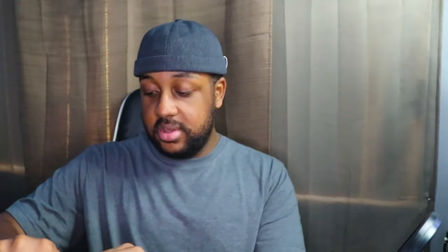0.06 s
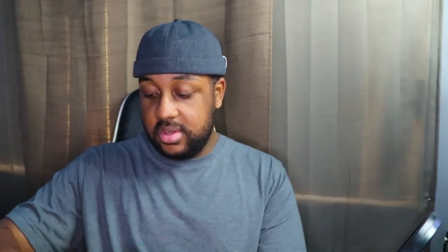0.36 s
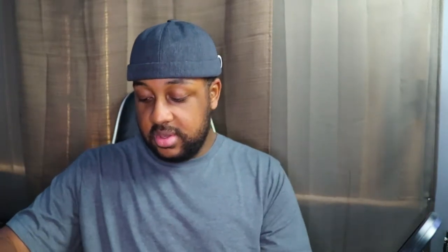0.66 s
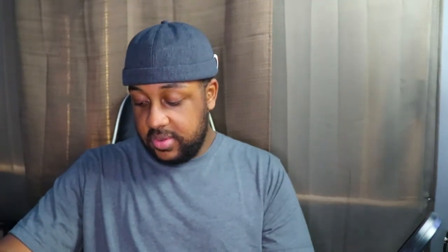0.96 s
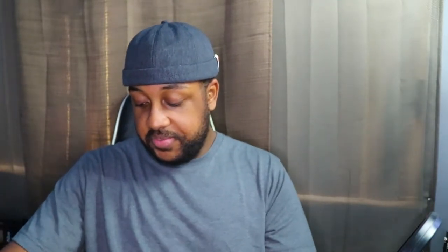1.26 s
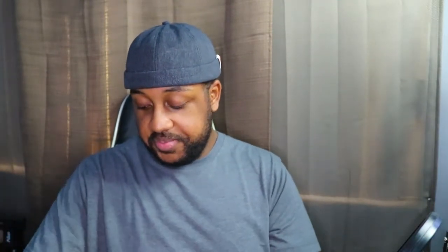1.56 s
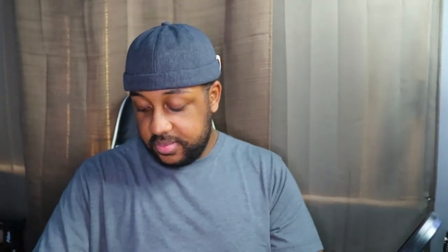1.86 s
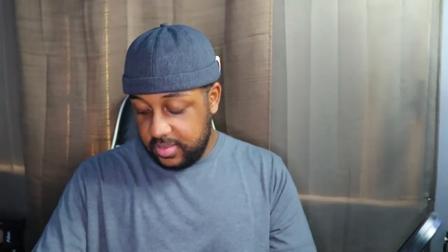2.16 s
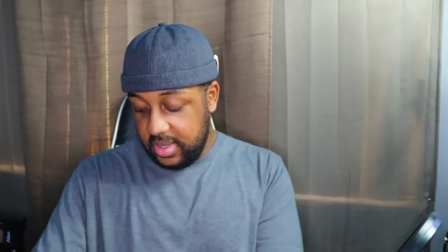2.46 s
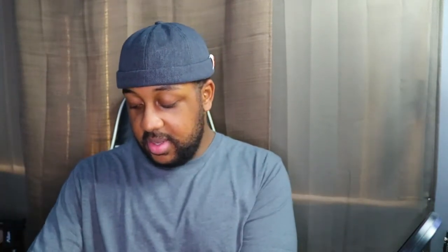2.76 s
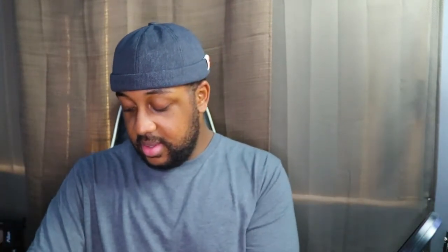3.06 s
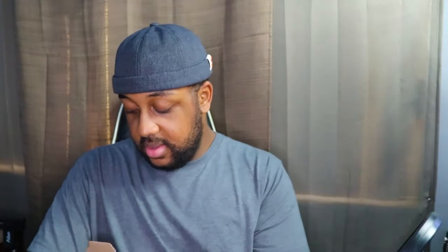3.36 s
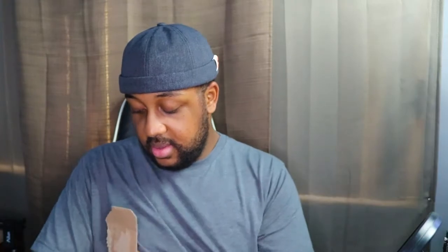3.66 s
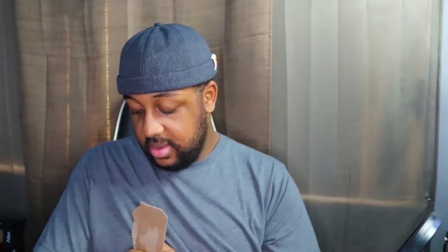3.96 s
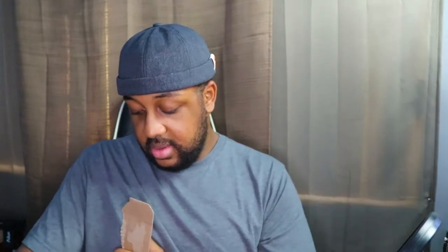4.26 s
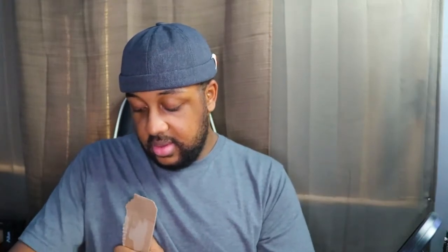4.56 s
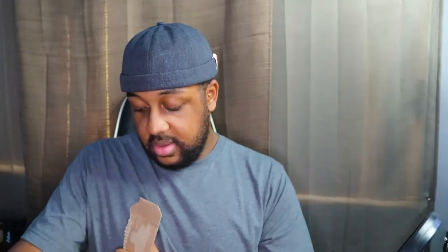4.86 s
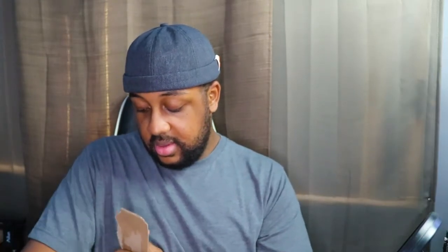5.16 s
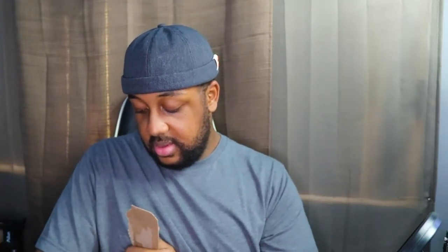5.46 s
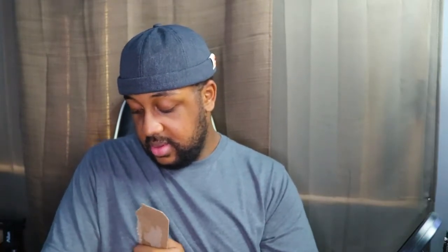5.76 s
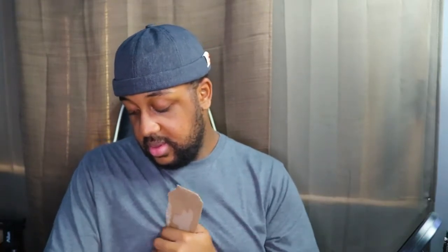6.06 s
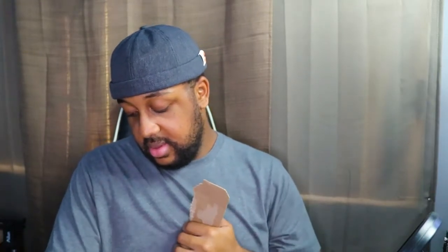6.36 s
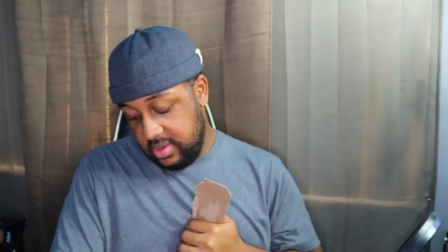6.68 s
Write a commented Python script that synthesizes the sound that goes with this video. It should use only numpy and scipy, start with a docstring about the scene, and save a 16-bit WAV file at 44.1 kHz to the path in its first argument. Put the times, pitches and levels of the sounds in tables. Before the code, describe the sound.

Hands tear open a small cardboard package close to the microphone in a small room. A quick run of short rips and snapping creases comes first, then a stiff flap pops loose. More tearing follows, then a quieter stretch of fingers rubbing the card and crinkling thin wrapping, before another cluster of rips and snaps. A faint room rumble lies underneath.

```python
"""Tearing open a cardboard package

Hands tear open a small box close to a microphone pair in a small room. Each tug is a short rip:
breaking fibres ring the card. Creases snap and a stiff flap pops loose. Between tugs the fingers
rub the card and crinkle the wrapping over a faint room rumble."""
import sys
import numpy as np
from scipy import signal
from scipy.fft import rfft, irfft, next_fast_len
from scipy.io import wavfile
from scipy.ndimage import map_coordinates

SR = 44100
rng = np.random.default_rng(int(sys.argv[2]) if len(sys.argv) > 2 else 0)


def digitize_waveform(pressure):
    """Quantize a signal to 16-bit integers and store it at the path in sys.argv[1].

    Rows of a 2-D input are taken as channels; values are limited to [-1, 1].
    """
    field = np.atleast_2d(pressure).T
    bounded = np.clip(field, -1, 1)
    quanta = np.round(bounded * 32767).astype(np.int16)
    wavfile.write(sys.argv[1], SR, quanta)


N = 305266
SIZE = 16384  # samples per event
HZ = np.fft.rfftfreq(SIZE, 1 / SR)
T = np.arange(SIZE) / SR

# Event levels are relative within each layer.
# room rumble spectrum: f/Hz, level/dB
RUMBLE_SPECTRUM = [(20, -10), (50, -10.5), (100, -8.5), (205, -0.5), (300, -8), (700, -11), (1200, -23),
                   (2400, -17), (7500, -27), (16000, -42)]
# sliding finger spectrum: f/Hz, level/dB
RUB_SPECTRUM = [(100, -10), (250, -7.5), (500, -2), (1200, -0.5), (2200, -7), (4000, -11), (16000, -36)]
# thin wrapping spectrum: f/Hz, level/dB
WRAPPING_SPECTRUM = [(600, -7.5), (2000, -10.5), (3500, 3.5), (6000, 1.5), (8500, -0.5), (11000, -5),
                     (16000, -11)]
# finger slides to a new hold: t/s, length/s, rub/dB, crinkle/dB
SLIDES = [(0.226, 0.022, -50, -53), (1.37, 0.1, -45, -44.5), (1.66, 0.03, -55, -65),
          (1.814, 0.015, -45, -50.5), (2.108, 0.094, -60, -58), (2.66, 0.037, -67, -53.5),
          (2.732, 0.14, -56, -54), (2.933, 0.016, -41.5, -53), (3.093, 0.041, -58, -44.5),
          (3.225, 0.14, -50, -48), (3.75, 0.12, -58, -57.5), (4.138, 0.13, -54.5, -54.5),
          (4.245, 0.04, -44.5, -61), (4.352, 0.069, -52.5, -65), (4.592, 0.15, -49.5, -70),
          (4.72, 0.15, -54, -54), (4.915, 0.087, -50, -52), (5.11, 0.19, -53.5, -59.5),
          (5.566, 0.13, -55.5, -50.5), (6.293, 0.052, -53, -53), (6.605, 0.054, -65, -57.5)]
# hands still: t/s, length/s
RESTS = [(1.934, 0.18), (2.362, 0.065), (4.027, 0.091), (4.31, 0.055), (4.534, 0.064), (5.747, 0.11),
         (6.395, 0.23)]
# tugs: t/s, length/s, level/dB, hollow/dB, card ring/dB
TUGS = [(0.018, 0.013, -24.5, -3, -0.5), (0.043, 0.013, -20.5, -8.5, -1.5), (0.074, 0.014, -24, 9.5, 8),
        (0.301, 0.015, -20.5, -0.5, 3), (0.337, 0.013, -20, 4.5, -4), (0.3723, 0.013, -17.5, 1, -1),
        (0.533, 0.051, -40.5, -2, -2), (0.581, 0.017, -24.5, -2.5, -2.5), (0.613, 0.024, -21, -4, -1.5),
        (0.753, 0.023, -22.5, -7, -2.5), (0.968, 0.016, -19, -4.5, 1), (1.128, 0.01, -16, -4.5, 0.5),
        (1.247, 0.0074, -14, -5, 1.5), (1.279, 0.061, -32, -4, 2), (1.306, 0.011, -15.5, -10.5, -2),
        (1.483, 0.028, -21.5, -8.5, 0.5), (3.155, 0.024, -23.5, -6, 0), (3.324, 0.021, -22.5, -8, 2.5),
        (3.585, 0.067, -19, -8, 1.5), (5.373, 0.02, -29.5, -7.5, -3.5), (5.42, 0.04, -28.5, -6, 0.5),
        (5.665, 0.026, -31, 0, 4), (5.889, 0.033, -26, -5, 1), (5.924, 0.046, -26.5, -2.5, 0.5),
        (5.995, 0.016, -29, -2, -1), (6.111, 0.027, -24, -12, 4), (6.158, 0.024, -26.5, -4, -0.5),
        (6.901, 0.016, -21, -7.5, -5.5)]
# torn card spectrum: f/Hz, level/dB
CARD_SPECTRUM = [(20, -32), (50, -25.5), (200, -11.5), (300, -10), (550, -4.5), (780, -5), (1270, -4),
                 (1700, -4), (2200, -9), (3000, -7), (7200, -12), (8400, -15), (10000, -17), (15500, -24.5)]
# box panel resonances: f/Hz, width/Hz, level/dB
PANEL_MODES = [(640, 77, -14.5), (965, 50, -37), (1287, 150, -2), (5150, 950, -11), (8500, 350, 0.5)]
# creases and glue spots: t/s, level/dB, body/dB, sizzle/dB
SNAPS = [(0.078, -17, 2, -29), (0.3056, -15, -2, -12), (0.5761, -14, -24, 2.5), (0.934, -36.5, -14, 18),
         (1.354, -18, -15, 10.5), (2.3233, -40, -8, -2), (2.4374, -27, -5, 12), (3.074, -25, -46, 9),
         (3.1463, -28, 2, 2), (3.1681, -13, -9, 0), (3.3063, -12.5, -3, 4.5), (3.321, -15, -17, -11),
         (3.61, -11.5, -5, -8), (3.7807, -25.5, 3, -8), (4.721, -24.5, -1.5, 6.5), (5.4349, -18, -2.5, -9),
         (5.6738, -20, -8.5, -32), (5.8836, -12, -13, -6.5), (5.9362, -18.5, 3, -10),
         (6.1122, -11, -12.5, -4), (6.12, -15.5, -12, 10), (6.649, -41, -16, 7), (6.811, -36.5, -4, -7),
         (6.9077, -23.5, 0, 16)]
# flap springs free or knocks: t/s, level/dB, brightness/dB
FLAP_POPS = [(1.819, -33.5, -4), (2.457, -7.5, -0.5), (2.4575, -15, 15), (2.4642, -28.5, -2),
             (2.4673, -20, -2), (2.938, -33, 7.5), (2.953, -30, -19), (4.6827, -23, -9)]
# flap spectrum: f/Hz, level/dB
FLAP_SPECTRUM = [(40, -37), (180, -16), (330, -6), (510, 4.5), (760, 1), (1200, -4.5), (1550, 5),
                 (2100, -6.5), (2800, -1.5), (4200, -5), (8000, -9), (10500, -12.5), (13000, -23),
                 (16000, -29)]
# top treble boost as the package is lifted: t/s, gain/dB
LIFT_GAIN = [(4.7, 4.5), (5.4, 9.5), (6.9, 4.5)]
# room decay: f/Hz, T60/s
ROOM_T60 = [(150, 0.35), (500, 0.21), (1300, 0.25), (4000, 0.23), (9000, 0.2), (16000, 0.16)]
# microphone balance: f/Hz, left minus right/dB
MIC_BALANCE = [(100, 2.2), (600, 0.6), (1400, 0), (2800, -1.3), (5500, -1), (10000, 1.5), (14000, 1.5)]


def amp(db):
    """Decibels to gain."""
    return 10 ** (np.asarray(db) / 20)


def unit(x):
    """Scale to rms 1."""
    return x / np.sqrt(np.mean(np.abs(x) ** 2) + 1e-20)


def along(points, hz):
    """Interpolate (f/Hz, value) points on a log axis."""
    f, v = np.transpose(points)
    return np.interp(np.log(hz + 1), np.log(f + 1), v)


def wobble(rate_hz, size):
    """Smooth random curve, rate_hz knots a second."""
    knots = rng.standard_normal(int(size * rate_hz / SR) + 4)
    return map_coordinates(knots, [np.arange(size) * rate_hz / SR], order=2)


def filtered(x, response):
    """Apply a frequency response."""
    m = next_fast_len(N + SIZE)
    return irfft(rfft(x, m) * response(np.fft.rfftfreq(m, 1 / SR)), m)[..., :N]


def shaped(x, spectrum):
    """Filter by a spectrum table, rms 1."""
    return unit(filtered(x, lambda hz: amp(along(spectrum, hz))))


def causal(gain):
    """Minimum-phase response: rings only after its cause."""
    cepstrum = irfft(np.log(np.maximum(gain, 1e-6)))
    cepstrum[1:SIZE // 2] *= 2
    cepstrum[SIZE // 2 + 1:] = 0
    return np.exp(rfft(cepstrum))


def add(track, at_s, sound):
    """Mix a sound in."""
    part = track[:, max(round(at_s * SR), 0):][:, :SIZE]
    part += sound[:, :part.shape[1]]


def diffuse(size, alike_hz=900):
    """Noise from all sides: the microphones agree only on long waves."""
    a, b = rfft(rng.standard_normal((2, size)))
    coherence = 0.98 * np.exp(-(np.fft.rfftfreq(size, 1 / SR) / alike_hz) ** 2)
    turn = np.arccos(coherence) / 2
    mid, side = np.cos(turn) * a, np.sin(turn) * b
    return irfft([mid + side, mid - side], size)


def walls(near_db=7, near_decay_s=0.0068, build_s=0.003):
    """Stereo echo response: hands and desk scatter at once, then the room decays."""
    hz, t, bands = signal.stft(diffuse(SIZE * 3 // 4), SR, nperseg=256)
    decay = amp(-60 * t / along(ROOM_T60, hz)[:, None])
    tail = signal.istft(bands * decay, SR, nperseg=256)[1]
    t = T[:tail.shape[1]]
    onset = 1 - np.exp(-t / build_s)
    scatter = 1 + amp(near_db) * np.exp(-t / near_decay_s)
    return unit(rfft(tail * onset * scatter, SIZE))


def paths(room, wet_db, lag_ms=0.11, wander_ms=0.03, desk_ms=0.885, desk_db=-11, steady_db=-5):
    """Direct sound, left first; desk reflection; wall echoes that shift as the hands move."""
    lag_s = (lag_ms + wander_ms * rng.standard_normal()) / 1000
    bounce_s = desk_ms * np.exp(rng.normal(0, .25)) / 1000
    direct = np.exp(-2j * np.pi * HZ * np.array([[0], [lag_s]]))
    desk = 1 + amp(desk_db) * np.exp(-2j * np.pi * HZ * bounce_s)
    steady = amp(steady_db) * np.sqrt(1500 / (HZ + 200))  # long waves barely notice a move
    echoes = (steady * room + walls()) / np.sqrt(1 + steady ** 2)
    return unit(direct * desk) + amp(wet_db) * echoes


def rumble(level_db=-59):
    """Steady diffuse room background."""
    return amp(level_db) * shaped(diffuse(next_fast_len(N)), RUMBLE_SPECTRUM)


def fibres(size, rate_hz, spread_db):
    """Tiny breaks at random moments, a few much larger than the rest."""
    breaks = rng.random(size) < rate_hz / SR
    signs = rng.choice([-1, 1], size)
    return breaks * signs * amp(spread_db * np.clip(rng.standard_normal(size), -2, 2))


def effort(fidget_db=2.5, fidget_hz=7, rest_fade_s=0.043, tighten_s=0.055, settle_s=0.071,
           swell_share=0.22, release_s=0.028):
    """Rub and crinkle gains: light hold, flexing around tugs and finger slides add in power."""
    t = np.arange(N) / SR
    # rows: rub, crinkle
    hold_db, rest_db, flex_db = np.array([[[-60], [-60.5]], [[-3], [-9.5]], [[-29], [-28]]])
    still = sum(np.clip(np.minimum(t - at_s, at_s + length_s - t) / rest_fade_s + .5, 0, 1)
                for at_s, length_s in RESTS)
    power = amp(hold_db + rest_db * still + fidget_db * wobble(fidget_hz, N)) ** 2
    for at_s, length_s, db, *_ in TUGS:
        tighten = np.exp(-np.maximum(at_s - t, 0) / tighten_s)
        settle = np.exp(-np.maximum(t - at_s - length_s, 0) / settle_s)
        power += (amp(db + flex_db) * tighten * settle) ** 2
    for at_s, length_s, rub_db, crinkle_db in SLIDES:
        swell = np.clip((t - at_s) / (swell_share * length_s), 0, 1)
        release = np.exp(-np.maximum(t - at_s - length_s, 0) / release_s)
        power += (amp([[rub_db], [crinkle_db]]) * swell * release) ** 2
    return np.sqrt(power)


def handling(room, uneven_db=2.8, crinkle_db=0.5, flicker_db=0.52, block=2048):
    """Fingers drag over the card while the wrapping ticks and hisses."""
    rub, crinkle = effort()
    drag = fibres(N, rate_hz=3000, spread_db=4.5) * amp(uneven_db * wobble(45, N))
    hiss = unit(fibres(N, rate_hz=3800, spread_db=7.5))
    ticks = amp(-14.5) * unit(fibres(N, rate_hz=47, spread_db=17))
    crinkle *= amp(crinkle_db + flicker_db * wobble(46, N))
    rustle = rub * shaped(drag, RUB_SPECTRUM) + crinkle * shaped(hiss + ticks, WRAPPING_SPECTRUM)
    out = np.zeros((2, N))
    for i in range(0, N, block):  # moving hands: new paths per block
        add(out, i / SR, irfft(rfft(rustle[i:i + block], SIZE) * paths(room, wet_db=-1)))
    return out


def card(hollow_db, ring_db, sizzle_db):
    """Box response, energy 1; the grip sets how hollow or bright it is."""
    grip = [(500, hollow_db), (1100, ring_db), (1800, ring_db), (3000, 0), (5500, 0), (12500, sizzle_db)]
    panels = 1 + sum(amp(db) / (1 + (2 * (HZ - hz) / width_hz) ** 2) for hz, width_hz, db in PANEL_MODES)
    return unit(causal(amp(along(CARD_SPECTRUM, HZ) + along(grip, HZ)) * panels))


def rips(room, lead_s=0.0013, swell_s=0.0047, release_s=0.0056, strain_s=0.006, strain_db=-15,
         slip_hz=350, slip_db=3, sizzle_db=3.5, gain_db=-1, spot_count=3):
    """A few fibres give under strain; then the tear sticks and slips, breaking clumps at several spots."""
    out = np.zeros((2, N))
    t = T - 4 * strain_s
    swell = np.clip((t + lead_s) / (swell_s + lead_s), 0, 1)
    strain = amp(strain_db) * np.exp(-np.abs(t) / strain_s)
    for at_s, length_s, db, hollow_db, ring_db in TUGS:
        release = np.exp(-np.maximum(t - length_s, 0) / release_s)
        pull = (swell + strain) * release * amp(slip_db * wobble(slip_hz, SIZE))
        spots = np.array([pull * fibres(SIZE, rate_hz=1700, spread_db=5) for _ in range(spot_count)])
        spots *= np.sqrt(length_s * SR) / np.linalg.norm(spots)
        tear = sum(rfft(breaks) * paths(room, wet_db=0) for breaks in spots)
        ring = card(hollow_db, ring_db, ring_db + sizzle_db)
        add(out, at_s + t[0], amp(db + gain_db) * irfft(tear * ring))
    return out


def jolt(flutter_s, flutter_db):
    """Spectrum of a sheet that flips at once, then flutters briefly."""
    flutter = rng.standard_normal(SIZE) * np.exp(-T / flutter_s)
    return 1 + amp(flutter_db) * unit(rfft(flutter))


def snaps(room, ring_share=0.52, gain_db=19):
    """Creases flip and glue spots let go, each ringing the card once."""
    out = np.zeros((2, N))
    for at_s, db, body_db, sizzle_db in SNAPS:
        ring = card(body_db, ring_share * body_db, sizzle_db)
        snap = unit(jolt(flutter_s=0.00072, flutter_db=0) * ring)
        add(out, at_s, amp(db + gain_db) * irfft(snap * paths(room, wet_db=-2)))
    return out


def flap_pops(room, gain_db=19):
    """The stiff flap springs free or knocks, lower and harder than a crease."""
    out = np.zeros((2, N))
    for at_s, db, bright_db in FLAP_POPS:
        tilt_db = along([(1000, 0), (6000, bright_db)], HZ)
        flap = causal(amp(along(FLAP_SPECTRUM, HZ) + tilt_db))
        pop = unit(jolt(flutter_s=0.0015, flutter_db=-5) * flap)
        add(out, at_s, amp(db + gain_db) * irfft(pop * paths(room, wet_db=-1)))
    return out


def lifted(x, edge_hz=12000):
    """The shortest waves leave the card in a beam; lifting turns it towards the microphones."""
    beam = filtered(x, lambda hz: (hz / edge_hz) ** 10 / (1 + (hz / edge_hz) ** 10))
    boost_db = np.interp(np.arange(N) / SR, *np.transpose(LIFT_GAIN))
    return x + (amp(boost_db) - 1) * beam


def scene():
    """All hand work in one room, over its rumble."""
    room = walls()
    return lifted(rips(room) + snaps(room) + flap_pops(room) + handling(room)) + rumble()


def record(dry):
    """Two slightly unlike microphones, clipping at full scale, band limit."""
    top_hz = 16000
    sides = filtered(dry, lambda hz: amp(np.array([[.5], [-.5]]) * along(MIC_BALANCE, hz)))
    return filtered(np.clip(sides, -1, 1), lambda hz: 1 / (1 + (hz / top_hz) ** 120))


dry = scene()
out = record(dry)
digitize_waveform(out)
```